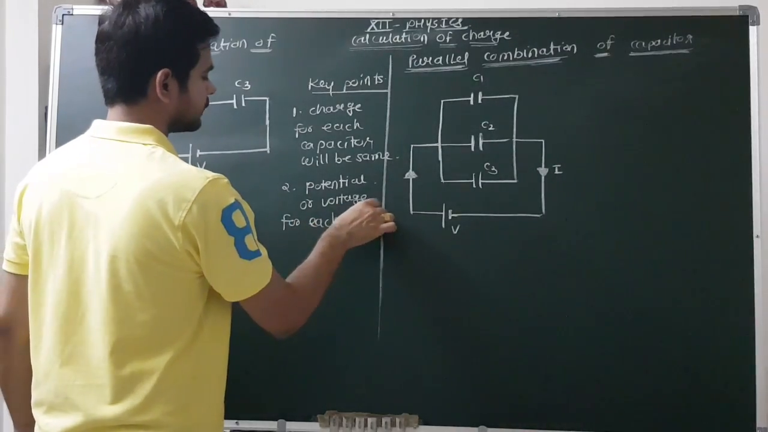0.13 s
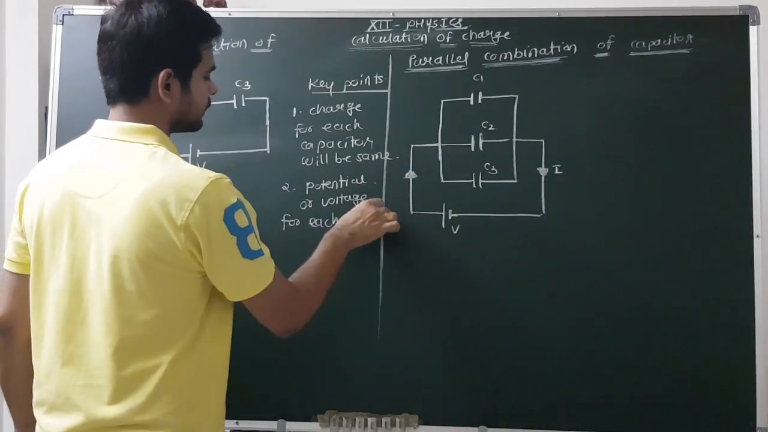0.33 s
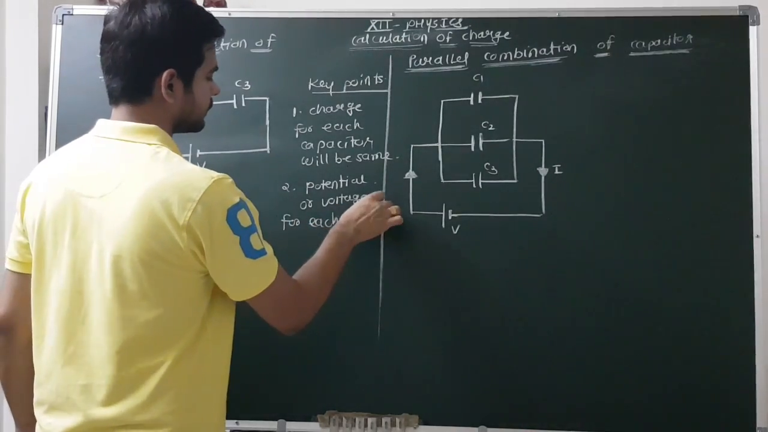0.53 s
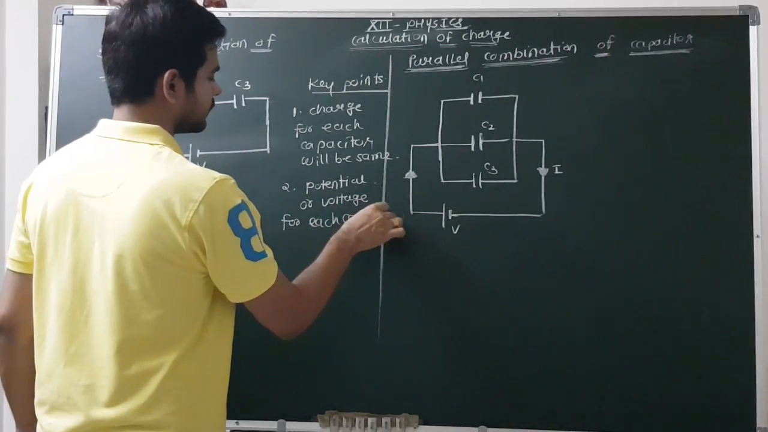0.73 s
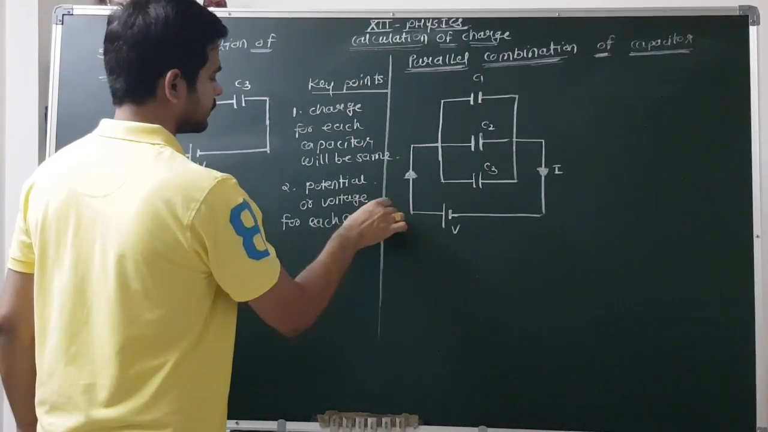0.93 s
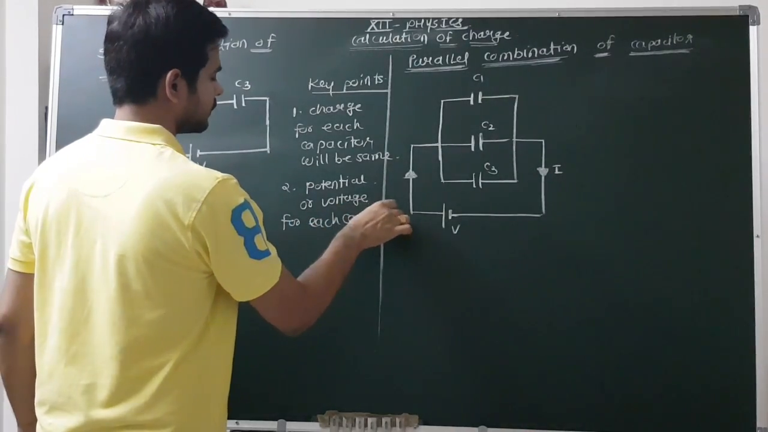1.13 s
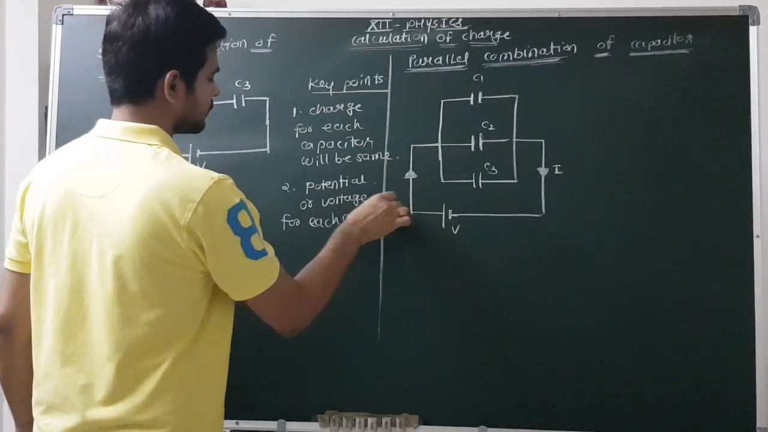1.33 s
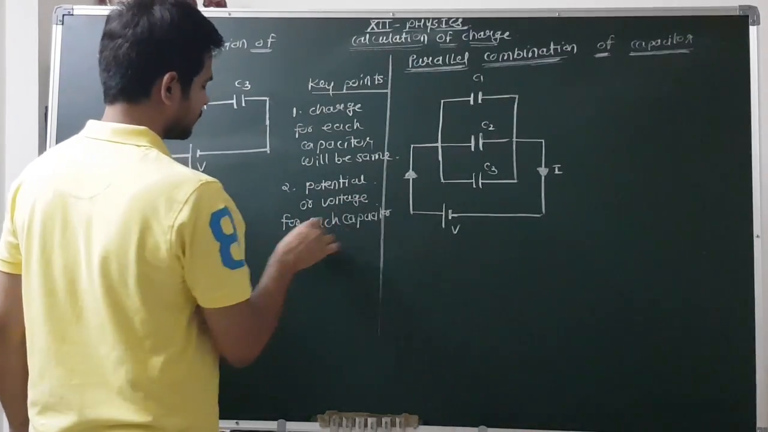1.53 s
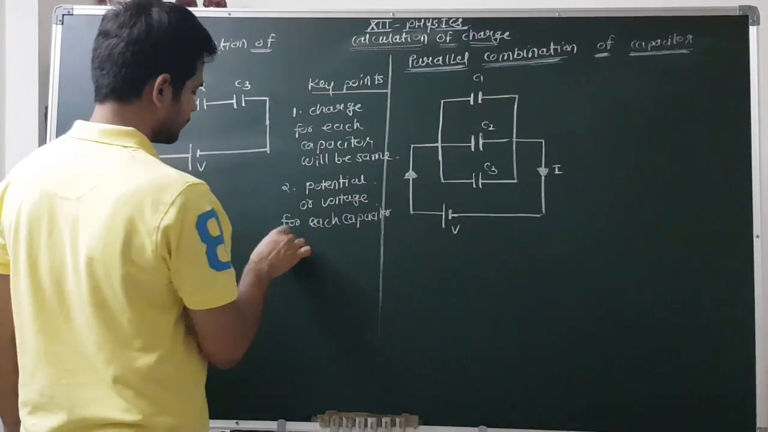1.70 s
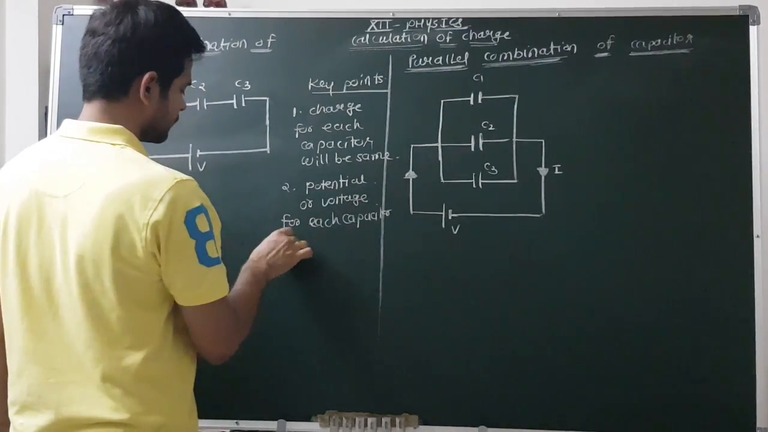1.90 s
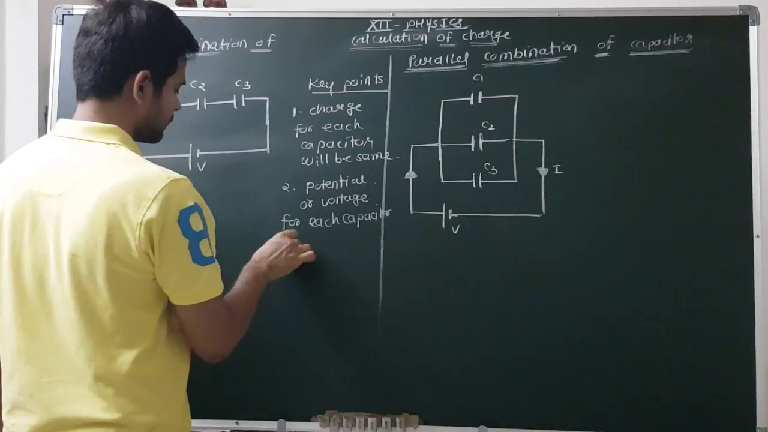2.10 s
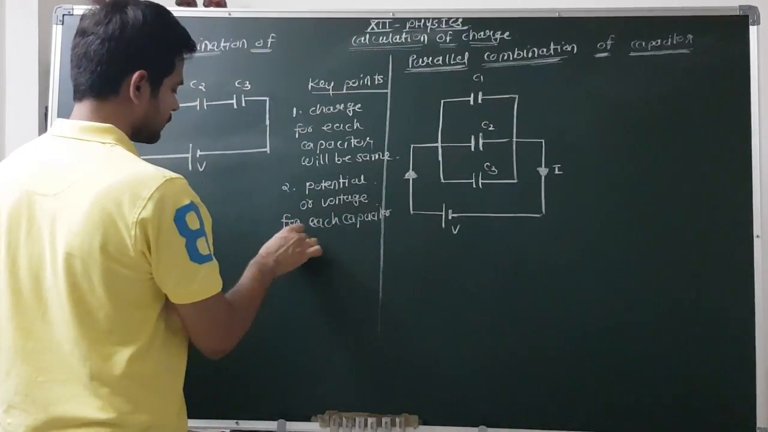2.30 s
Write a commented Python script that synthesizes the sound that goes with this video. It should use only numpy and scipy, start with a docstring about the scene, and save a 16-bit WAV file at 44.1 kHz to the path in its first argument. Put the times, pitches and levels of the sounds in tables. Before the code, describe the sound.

Chalk taps and scratches on a blackboard, pauses briefly, then writes a little more.

```python
"""Chalk on a blackboard in a bare classroom, over a low, steady rumble.
From the start a few letters are written: each touch-down knocks the board, each stroke is a dense
run of crumbling grains that rings the stick (treble) and the board (middle and bass).
The hand shakes the panel; the room echoes. Near 1.45 s the chalk pauses.
At 1.9 s it lands again for a last few strokes."""
import sys
import numpy as np
from scipy import signal
from scipy.fft import rfft, irfft, next_fast_len
from scipy.io import wavfile

SR = 44100
rng = np.random.default_rng(int(sys.argv[2]) if len(sys.argv) > 2 else 0)


def inscribe(sig):
    """Save sig as 16-bit PCM at rate SR to the path in sys.argv[1].

    A 1-D sig is mono; a 2-D sig holds one channel per row.
    Samples are clipped to [-1, 1] before scaling.
    """
    pcm = np.round(np.clip(np.atleast_2d(sig).T, -1, 1) * 32767)
    wavfile.write(sys.argv[1], SR, pcm.astype(np.int16))


N = 103767
T = np.arange(N) / SR

# Chalk slides. Each row: start in seconds, length in seconds, stick level in dB, board level in dB,
# lower stick ring in Hz, its relative gain in dB, upper stick ring in Hz.
CHALK_STROKES = [(-.015, .065, -43.5, -51.5, 5430, -6, 6880), (0.183, 0.12, -45.5, -51.5, 5900, -2, 6900),
                 (0.401, 0.058, -41, -52, 5680, -2.5, 6940), (0.613, 0.025, -47.5, -57, 5000, 0, 6300),
                 (0.671, .100, -45, -54.5, 5460, -4, 6670), (0.865, 0.067, -46, -53.5, 5560, -3.5, 6580),
                 (0.974, 0.075, -48.5, -58.5, 5360, 2, 7000), (1.061, 0.068, -45, -48.5, 5500, 0.5, 6940),
                 (1.17, .058, -44, -53, 5370, 0, 7100), (1.252, 0.12, -50, -55, 5500, 2, 6940),
                 (1.298, .053, -42.5, -49.5, 5740, 6, 6800), (1.35, 0.1, -80, -64.5, 5730, -2, 7000),
                 (1.884, 0.066, -41.5, -47, 6160, 8, 7870), (1.959, 0.078, -43, -49, 6150, -2, 6960),
                 (2.082, 0.057, -44.5, -54.5, 6200, -36, 6600), (2.145, 0.087, -48.5, -54.5, 6560, 5, 8200),
                 (2.214, 0.055, -42, -47.5, 5800, -1.5, 7040)]
# Chalk landings. Each row: time in seconds, knock gain in dB, contact cut-off in Hz (lower is softer),
# stick tick peak in dB.
CHALK_TAPS = [(.1640, -15.5, 2740, -25), (0.379, -27.5, 1250, -54), (0.6119, -19, 1410, -27),
              (.8612, -27, 1500, -41), (1.8837, -17.5, 2400, -39)]
# Spectra of the rubbed stick, the rubbed board and the knocked board.
# Each row: frequency in Hz, relative gain in dB.
STICK_SPECTRUM = [(2500, -30.5), (4300, -1), (5000, 1.5), (7000, 1.5), (8500, 2.5), (9800, -4.5),
                  (11000, -10), (13000, -32)]
BOARD_SPECTRUM = [(200, -14.5), (420, -2), (700, 4), (1400, 1.5), (2100, -1), (3000, -2), (4000, -7),
                  (6000, -0.5), (10000, -28.5), (14000, -33)]
KNOCK_SPECTRUM = [(60, 3.5), (250, 1), (420, 0), (650, 5), (1000, -1.5), (1500, -1.5), (2300, -5),
                  (3300, -2)]
# Board modes. Each row: frequency in Hz, relative gain in dB, T60 in seconds.
PANEL_MODES = [(44.6, -33, 0.27), (74.7, -30, 0.55), (135.74, -25.5, 1.0), (200, -27.5, 0.26),
               (257.5, -21, .15), (273.4, -29, 0.86), (685, -40, 0.66), (850, -40, 0.62), (1340, -32, 0.16)]
# Panel shake under the hand. Each row: time in seconds, level in dB.
SHAKE_ENVELOPE = [(0, -49), (.3, -51), (.45, -43), (.56, -55.5), (.75, -49.5), (1.02, -50), (1.19, -44),
                  (1.4, -50.5), (1.6, -57.5), (1.87, -55), (2.0, -51), (2.12, -56.5), (2.35, -56.5)]
# Spectrum of that shake. Each row: frequency in Hz, relative gain in dB.
SHAKE_SPECTRUM = [(20, 2.5), (38, -20), (65, 3.5), (95, -1.5), (135, -1), (170, -3.5), (260, -3),
                  (330, -17), (600, -29), (2000, -52)]
# Soft hand bumps. Each row: centre in seconds, half-width in seconds, level in dB, pitch in Hz.
HAND_BUMPS = [(1.189, 0.058, -47.5, 200), (1.263, 0.036, -52, 59.5), (1.96, 0.014, -50, 129)]
# Classroom decay. Each row: frequency in Hz, T60 in seconds.
ECHO_T60 = [(100, 0.1), (300, 0.88), (1000, 0.36), (3000, 0.57), (7000, 0.49), (12000, 0.51)]
# Echo colour. Each row: frequency in Hz, gain in dB.
ECHO_SPECTRUM = [(60, -10), (250, -3.5), (450, -4.5), (680, 0.5), (1000, 0.5), (1500, 3), (3000, 4.5),
                 (7000, -6.5), (12000, 5)]
# Steady room noise. Each row: frequency in Hz, relative gain in dB.
RUMBLE_SPECTRUM = [(20, -27.5), (42, 7.5), (80, -16.5), (130, -1), (200, -10), (265, -4), (380, -15.5),
                   (700, -18.5), (1000, -27), (1400, -30.5), (2000, -40), (3800, -38.5), (5200, -31.5),
                   (8500, -33), (11000, -40.5), (14000, -79)]


def strokes(attack_s=0.023, release_s=0.0098):
    """One sound per stroke: pressure swells, holds and lets go; grains ring stick and board."""
    friction = grains()
    bright = colour(friction, STICK_SPECTRUM)
    board = unit_rms(colour(friction, BOARD_SPECTRUM))
    sounds = []
    for start_s, length_s, stick_db, board_db, lower_hz, lower_db, upper_hz in CHALK_STROKES:
        pressure = np.clip((T - start_s) / attack_s, 0, 1)
        pressure *= np.exp(-np.maximum(T - start_s - length_s, 0) / release_s)
        chalk = unit_rms(stick(bright, lower_hz, upper_hz, lower_db))
        sounds.append(pressure * (from_db(stick_db) * chalk + from_db(board_db) * board))
    return sounds


def grains(rate_per_s=9000, spread_db=3.5, judder_db=0.5):
    """Chalk crumbles in dense clicks of uneven size; the grip wavers."""
    sizes = from_db(spread_db * np.minimum(rng.exponential(1, N), 4))
    signs = rng.choice([-1, 1], N)
    breaks = rng.random(N) < rate_per_s / SR
    judder = from_db(judder_db * drift(cutoff_hz=120))
    return unit_rms(sizes * signs * breaks * judder)


def stick(x, lower_hz, upper_hz, lower_db=0, upper_db=-1, width_hz=1110):
    """The chalk stick's two broad resonances; they shift with grip and angle."""
    lower = from_db(lower_db) * resonance(x, lower_hz, width_hz)
    upper = from_db(upper_db) * resonance(x, upper_hz, width_hz)
    return lower + upper


def taps():
    """One sound per landing: the board knocks and the stick ticks."""
    sounds = []
    for time_s, knock_db, contact_hz, tick_db in CHALK_TAPS:
        click = (np.arange(N) == int(time_s * SR)) + 1e-18
        knock = board_knock(click, contact_hz)
        tick = butter(stick(click, lower_hz=5000, upper_hz=7000), 6, [4400, 9000], "band")
        sounds.append(from_db(knock_db) * knock + from_db(tick_db) * tick / np.abs(tick).max())
    return sounds


def board_knock(click, contact_hz, crack_db=-2.5, recoil_db=-4):
    """A short push on the board, which cracks, springs back and rings."""
    push = butter(click, 5, contact_hz)
    push /= push.max()
    crack = from_db(crack_db) * signal.fftconvolve(push, board_crack())[:N]
    recoil = from_db(recoil_db) * ring(push, hz=88, t60_s=0.021)
    modes = sum(from_db(db) * ring(push, hz, t60_s, np.pi / 2) for hz, db, t60_s in PANEL_MODES)
    return colour(push + crack + (modes - recoil) / push.sum(), KNOCK_SPECTRUM)


def board_crack(lowest_hz=463, t60_s=0.041):
    """The board's dense upper modes as a fast-dying noise burst of unit energy."""
    t = T[:SR // 10]
    burst = butter(rng.standard_normal(len(t)), 2, lowest_hz, "high")
    burst *= from_db(-60 * t / t60_s)
    return burst / np.sqrt(np.sum(burst ** 2))


def board_shake(bump_width_hz=27):
    """The panel rumbles under the moving hand, with a few soft bumps."""
    level_db = np.interp(T, *np.transpose(SHAKE_ENVELOPE))
    shake = from_db(level_db) * unit_rms(colour(rng.standard_normal(N), SHAKE_SPECTRUM))
    for centre_s, half_width_s, db, hz in HAND_BUMPS:
        band = resonance(rng.standard_normal(N), hz, bump_width_hz)
        throb = unit_rms(resonance(band, hz, bump_width_hz))
        shake += from_db(db) * throb * np.exp(-((T - centre_s) / half_width_s) ** 2)
    return shake


def echoes(sounds, patterns=4):
    """The chalk moves along the board, so successive sounds meet different echo patterns."""
    return sum(classroom(sum(sounds[k::patterns])) for k in range(patterns))


def classroom(x, delay_s=0.0013, build_s=0.011):
    """Diffuse echo: octave bands of noise, each dying at its own rate."""
    t, hz = T[:SR], np.arange(SR // 2 + 1)
    white = rfft(rng.standard_normal(SR))
    build = np.clip((t - delay_s) / build_s, 0, 1)
    response = np.zeros(SR)
    for low_hz in 30 * 2 ** np.arange(10):
        octave = irfft(white * (hz >= low_hz) * (hz < 2 * low_hz), SR)
        fade = build * from_db(-60 * t / at_hz(ECHO_T60, low_hz * np.sqrt(2)))
        response += octave * fade / np.sqrt(np.sum(fade ** 2))
    return colour(signal.fftconvolve(x, response)[:N], ECHO_SPECTRUM)


def room_tone(rumble_db=-52.5, whirr_db=-73):
    """Steady rumble and hiss with a faint, narrow whirr."""
    whirr = resonance(rng.standard_normal(N), hz=1284, width_hz=53)
    rumble = colour(rng.standard_normal(N), RUMBLE_SPECTRUM)
    return from_db(rumble_db) * unit_rms(rumble) + from_db(whirr_db) * unit_rms(whirr)


def from_db(db):
    """Decibels to gain."""
    return 10 ** (np.asarray(db) / 20)


def unit_rms(x):
    """Scale to unit rms."""
    return x / np.sqrt(np.mean(x ** 2) + 1e-20)


def at_hz(points, hz):
    """Read a table on a log-frequency axis."""
    knots_hz, values = np.transpose(points)
    return np.interp(np.log(np.maximum(hz, 1)), np.log(knots_hz), values)


def butter(x, order, edge_hz, kind="low"):
    """Causal filter with a flat passband."""
    return signal.sosfilt(signal.butter(order, edge_hz, kind, fs=SR, output="sos"), x)


def colour(x, spectrum):
    """Minimum-phase filter with the given dB curve."""
    size = 2 * next_fast_len(N)
    hz = np.arange(size // 2 + 1) * SR / size
    cepstrum = irfft(np.log(from_db(at_hz(spectrum, hz))))
    cepstrum[1:size // 2] *= 2
    cepstrum[size // 2 + 1:] = 0
    return irfft(rfft(x, size) * np.exp(rfft(cepstrum)))[:N]


def drift(cutoff_hz):
    """Low-passed noise of unit rms."""
    return unit_rms(butter(rng.standard_normal(2 * N), 2, cutoff_hz)[N:])


def resonance(x, hz, width_hz):
    """Two-pole resonance, peak gain 1."""
    r, w = np.exp(-np.pi * width_hz / SR), 2 * np.pi * hz / SR
    numerator = np.array([1, 0, -1]) * (1 - r * r) / 2
    return signal.lfilter(numerator, [1, -2 * r * np.cos(w), r * r], x + 1e-18)


def ring(x, hz, t60_s, phase_rad=0):
    """One mode: a unit click starts a decaying sine of height 1."""
    r, w = np.exp(-np.log(1000) / (t60_s * SR)), 2 * np.pi * hz / SR
    numerator = [np.sin(phase_rad), r * np.sin(w - phase_rad)]
    return signal.lfilter(numerator, [1, -2 * r * np.cos(w), r * r], x + 1e-18)


def scene(treble_edge_hz=11800):
    """Writing, echo, panel shake and room tone, alike in both channels."""
    sounds = taps() + strokes()
    writing = butter(sum(sounds) + echoes(sounds), 10, treble_edge_hz)
    mono = writing + board_shake() + room_tone()
    return np.array([mono, mono])


def record(dry, hiss_db=-74, low_cut_hz=29.6, stopband_hz=15300):
    """Each channel gains its own faint hiss; the deepest bass and the top are cut."""
    hiss = from_db(hiss_db) * rng.standard_normal((2, N))
    thinned = butter(dry + hiss, 4, low_cut_hz, "high")
    return signal.sosfilt(signal.cheby2(12, 70, stopband_hz, fs=SR, output="sos"), thinned)


dry = scene()
out = record(dry)
inscribe(out)
```